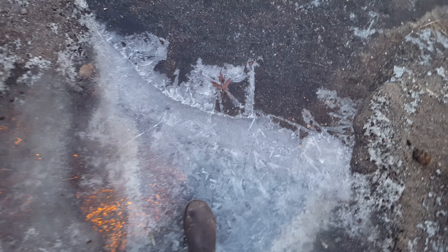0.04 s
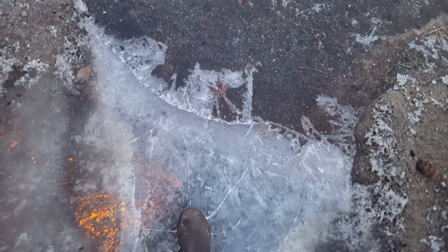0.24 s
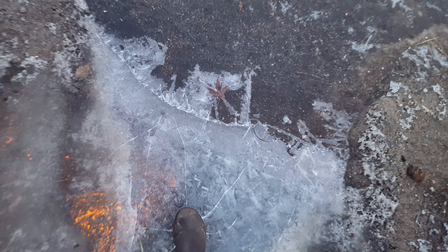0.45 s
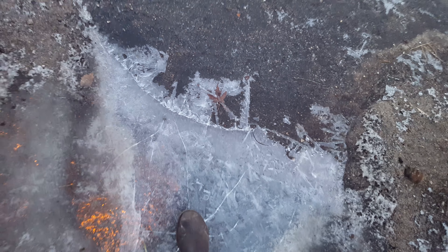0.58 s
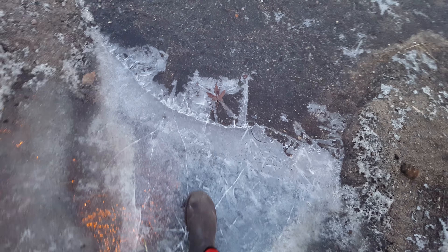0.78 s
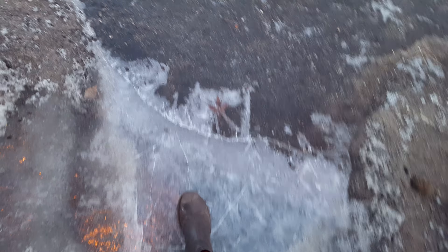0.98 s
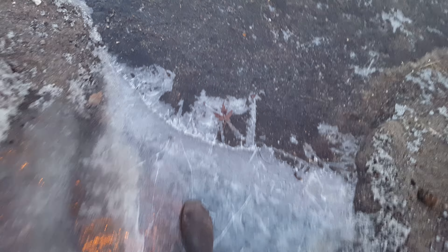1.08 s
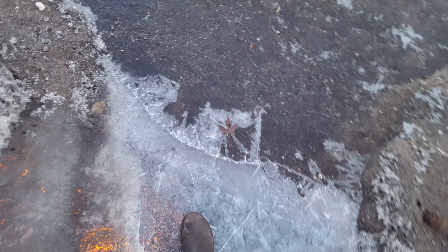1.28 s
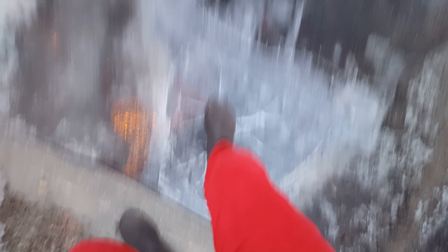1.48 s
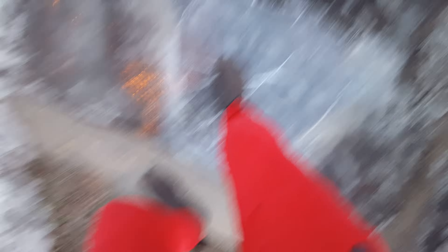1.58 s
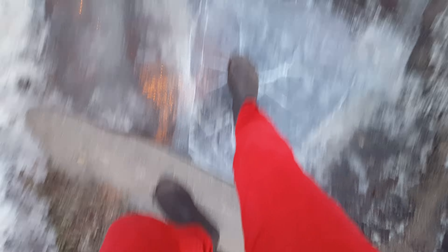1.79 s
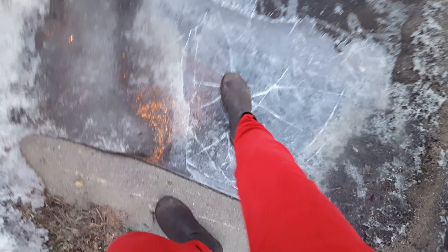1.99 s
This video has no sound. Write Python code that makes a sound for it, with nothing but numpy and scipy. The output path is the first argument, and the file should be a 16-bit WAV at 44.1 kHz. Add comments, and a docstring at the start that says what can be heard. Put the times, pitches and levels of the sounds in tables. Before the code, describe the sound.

Sharp, bright ice cracks with a hollow ring come in three bursts as a boot presses a frozen puddle, separated by tiny frosty pops and light crunching, over low outdoor rumble, picked up close in stereo.

```python
"""Outdoors, at a frozen puddle: a boot presses on the thin ice, heard by a hand-held microphone above.
Bursts of cracks are noise with sudden rise and exponential fall, partly resonant; damped sines ring as the
hollow sheet. Creak and crunch are noise puffed by uneven stick-slip, and frost grains pop as short noise bursts.
Under them lies a low outdoor rumble with faint hiss, made of filtered noise."""
import sys
import numpy as np
from scipy import signal
from scipy.fft import rfft, irfft
from scipy.io import wavfile
from scipy.ndimage import uniform_filter1d

SR = 44100
rng = np.random.default_rng(int(sys.argv[2]) if len(sys.argv) > 2 else 0)


def to_wav(sig):
    """Store sig (one row per channel, or 1-D mono) as 16-bit WAV at the path in sys.argv[1].

    Samples outside -1..1 are clipped; the rate is SR.
    """
    pcm = np.clip(np.atleast_2d(sig), -1, 1) * 32767
    pcm = np.round(pcm).astype(np.int16)
    wavfile.write(sys.argv[1], SR, pcm.T)  # frames by channels


N = 90404  # length in samples

# Cracks of the ice. Each row: start in seconds, nominal snap level in dB, then body, hollow ring and treble
# levels in dB re snap, snap t60 in seconds, then snap, body and ring pitches in Hz.
CRACKS = [(0.1983, -30.5, -8, 10, -1, 0.036, 2520, 1287, 227),
          (0.2018, -21, -3, -5.5, 2.5, 0.035, 1890, 1260, 220),
          (0.2092, -4.5, -2.5, -34, -7.5, 0.036, 2056, 703, 174),
          (0.2172, -22.5, 14, 5.5, -6, 0.049, 2270, 685, 162),
          (0.2353, -33, 4.5, -14, 7.5, 0.087, 2080, 1130, 160),
          (0.265, -30.5, 3.5, -16, -11, 0.056, 2550, 1280, 334),
          (0.2687, -23.5, 1.5, -17, 3, 0.057, 2250, 660, 347),
          (0.2943, -10, 2, -4, 0, 0.047, 1590, 385, 149.3),
          (0.296, -13, 1, -6.5, -13, 0.036, 2230, 393, 360),
          (0.3037, -23.5, 0.5, -0.5, 0.5, 0.057, 2120, 540, 124.4),
          (0.3685, -36.5, -2, -12, 2, 0.11, 2320, 1260, 125),
          (0.380, -36, 5, -23, -1, 0.051, 2250, 1004, 130),
          (0.3968, -39, -17, -7.5, 8, 0.031, 2360, 595, 118),
          (0.461, -39, 3.5, -34, -0.5, 0.031, 2400, 837, 220),
          (0.4972, -49, -15, -8, 14, 0.036, 2680, 536, 128),
          (0.516, -40, -11, -11.5, 4, 0.026, 2320, 1017, 119.7),
          (0.6395, -39, -18.5, -12, -20, 0.011, 2015, 1030, 130),
          (0.8573, -48.5, -4.5, -9.5, -1, 0.043, 2305, 1190, 118),
          (1.093, -40, -20, -25, 3, 0.038, 2260, 930, 310),
          (1.1001, -32, -7.5, -22, -1.5, 0.064, 2300, 920, 130),
          (1.1172, -23.5, -28, -9, -3, 0.049, 1630, 1250, 169),
          (1.1437, -38.5, 17, 5, 8, 0.029, 2280, 790, 148),
          (1.1492, -12, -5.5, -25, -7.5, 0.037, 2170, 990, 128),
          (1.158, -26.5, 11.5, 7.5, -28, 0.036, 2000, 977, 129),
          (1.1926, -43.5, -4, -2, -12, 0.096, 2380, 650, 131),
          (1.2102, -35.5, -15, -15, -14, 0.029, 2220, 1130, 192),
          (1.385, -37, -7, -6, 4, 0.07, 3130, 530, 243), (1.391, -24, -7, -37, 1.5, 0.043, 2450, 524, 179),
          (1.4086, -11.5, -10, -0.5, -3, 0.054, 2980, 513, 241),
          (1.4177, -22, 4.5, -1, 2, 0.14, 2740, 1036, 250),
          (1.432, -18.5, -2, -5, -6, 0.087, 2060, 546, 247),
          (1.4629, -16.5, -2.5, -17, -2.5, 0.037, 2850, 1030, 120),
          (1.4697, -27.5, 2.5, -4.5, 1.5, 0.087, 2300, 617, 134),
          (1.479, -18.5, -9, -27, -2, 0.049, 1980, 1027, 130),
          (1.496, -41.5, -2, 7, 1.5, 0.19, 3120, 634, 130),
          (1.5208, -23.5, -16, -37, -2, 0.042, 2300, 980, 352),
          (1.54, -34, 6, -7, 8.5, 0.058, 2010, 1025, 360),
          (1.5502, -37.5, 1, -6.5, 7.5, 0.07, 2230, 770, 390),
          (1.56, -35.5, -4, -33, 5, 0.036, 2840, 1095, 220),
          (1.627, -48, 3, 1.5, -14, 0.058, 2100, 627, 368),
          (1.7446, -43, 7, -27, -1, 0.023, 2360, 500, 218),
          (1.9687, -41.5, -6, -25, 2, 0.067, 2530, 804, 119)]
# Snap colour. Each row: frequency in Hz, relative level in dB per Hz.
SNAP_SPECTRUM = [(240, -18.5), (400, -6), (1040, -6.5), (1650, -10.5), (2290, -1.5), (2750, -5.5),
                 (3350, -7.5), (3900, -16), (6000, -19), (7800, -54.5), (13200, -120)]
# Treble colour of cracks, creaks and pops. Each row: frequency in Hz, relative level in dB per Hz.
TREBLE_SPECTRUM = [(2060, -20.5), (3500, -7.5), (3750, -7), (8420, -10.5), (12100, -6.5), (14600, -11.5),
                   (16000, -20)]
# Hollow modes of the ice sheet. Each row: frequency in Hz, level in dB, t60 in seconds.
SHEET_MODES = [(131.8, -2, 0.2), (164.2, 4, 0.11), (243.3, 0, 0.092), (346.4, -8, 0.2), (383, 1, 0.1),
               (515, -4, 0.1), (635, -2.5, 0.056)]
# Dull knocks of the boot on the sheet. Each row: start in seconds, level in dB, ring pitch in Hz.
KNOCKS = [(1.0147, -23.5, 165), (1.016, -27, 394), (1.13, -25.5, 172)]
# Creak and crunch under the sole, one list for each stretch. Each row: time in seconds, level in dB,
# treble in dB re level, slip depth from 0 to 1.
CREAKS = [
    [(0.31, -26.5, -1, 0), (0.326, -47.5, -5, 0.5), (0.618, -60, -2, 0.8), (0.635, -47, 2, 0.6)],
    [(0.635, -68, -16, 0.7), (0.64, -41, -8.5, 0.3), (0.74, -49, -3, 0.3), (0.765, -74, -4, 0.4)],
    [(1.02, -59.5, -12, 0.34), (1.082, -50.5, -6.5, 0.98), (1.116, -27, -8, 0), (1.149, -40.5, -7, 0.7)],
    [(1.17, -46, -10, 1), (1.215, -43.5, -8, 0.5), (1.235, -57, -5, 0.8), (1.33, -54.5, -15, 1),
     (1.36, -48.5, -1.5, 0.7), (1.385, -42, -9, 0.1)],
    [(1.57, -55, -11, 0.38), (1.604, -73, 15, 0.6), (1.64, -45, -3, 0.2), (1.748, -40, -8.5, 0.5),
     (1.768, -53, -8, 0.5), (1.79, -67, -5, 0.7)],
    [(1.88, -62, -7, 0.3), (1.966, -62.5, -2, 0.5), (2.028, -65.5, -13, 1), (2.05, -51, 3, 0.9)],
]
# Colour of the crunch. Each row: frequency in Hz, relative level in dB per Hz.
GRIT_SPECTRUM = [(180, -25.5), (300, -15.5), (483, -3), (686, -7), (797, -4.5), (1630, -8), (2230, -0.5),
                 (6000, -20.5), (7800, -58), (13200, -120)]
# Frost grains that pop one at a time. Each row: start in seconds, level in dB.
POPS = [(0.4396, -49), (0.7731, -59.5), (0.7876, -60.5), (0.9512, -70.5), (1.0183, -61), (1.053, -50.5),
        (1.085, -39), (1.1082, -28), (1.173, -42), (1.204, -47), (1.256, -51), (1.279, -51), (1.2902, -55),
        (1.304, -53), (1.315, -45.5), (1.3244, -52), (1.3328, -46.5), (1.3468, -43.5), (1.5926, -53),
        (1.6155, -43.5), (1.655, -38.5), (1.7635, -43.5), (1.7962, -57.5), (1.8394, -49), (1.908, -49.5),
        (1.9351, -46), (1.9883, -47), (1.9984, -45), (2.039, -51)]
# Outdoor background colour. Each row: frequency in Hz, relative level in dB per Hz.
AIR_SPECTRUM = [(15, -42.5), (25, -18.5), (70, -4), (170, -10), (317, -15.5), (373, -23.5), (962, -31.5),
                (1100, -41), (1700, -32), (2760, -47.5), (16000, -67)]
# Background level in time. Each row: time in seconds, level in dB.
AIR_LEVEL = [(0.0, -39), (0.22, -45), (0.37, -50.5), (0.95, -53.5), (1.15, -44.5), (1.6, -53), (1.8, -49),
             (2.05, -47)]
# Gain of the hiss above the rumble. Each row: time in seconds, gain in dB.
AIR_TILT = [(0, 4), (.2, 8.5), (.5, 3), (1, 9.5), (2.05, 7.5)]
# Left-right likeness of the ice sounds. Each row: frequency in Hz, likeness (clipped to 0-1 in use).
ICE_LIKENESS = [(60, 0.48), (180, 0.66), (550, 0.65), (1650, 0.21), (4970, -0.21), (15000, -0.04)]
# Left-right likeness of the background. Each row: frequency in Hz, likeness.
AIR_LIKENESS = [(60, 1), (400, 0.59), (1000, 0.17), (3000, 0.084)]
# Stereo balance of the ice sounds. Each row: frequency in Hz, left minus right in dB.
ICE_LEAN = [(60, -2.5), (180, -8.5), (550, 1), (1650, -6), (4970, -1), (15000, -1.5)]

SNAP_RISE_S, BODY_RISE_S, SPIT_RISE_S = 0.0012, 0.0012, 0.00024
BODY_LIFE, TREBLE_LIFE = 0.82, 0.66  # t60 as a share of the snap t60
HEAD_DB, HEAD_T60_S = -4.5, 0.0087  # first fracture, re snap, added to the splintering that follows
CLICK_DB = 14.5  # the instant of breaking, re snap
SPLINTER_DB = 1  # rms unevenness of the fractures
SNAP_WIDTH_HZ, BODY_WIDTH_HZ = 300, 120  # resonance bandwidths
PITCHED_GAIN, BROAD_GAIN = 0.57, 0.83  # resonant and broadband parts of the snap
RING_RISE_S, RING_DB_PER_OCTAVE = 0.0023, 8.5
SLIPS_PER_S, SLIP_T60_S = 160, 0.021  # nominal, both vary as the slip rate wanders
SLIP_SPREAD_DB, SLIP_WANDER_DB = 1.5, 2.0  # rms spread of slip sizes and of slip rate
POP_T60_S, POP_GRIT_DB = 0.024, -2
LAG_S = 0.00005  # the right port hears the ice first
MIC_LOW_HZ, EDGE_HZ = 53.6, 16100


def cracks():
    """Brittle fracture: a bright snap, a slower body under it, a quick treble spit and the ring of the sheet."""
    s, db, body_db, ring_db, treble_db, t60, snap_hz, body_hz, ring_hz = np.transpose(CRACKS)
    tail = bursts(db, t60, SNAP_RISE_S)
    head = bursts(db + HEAD_DB, np.full(len(s), HEAD_T60_S), SNAP_RISE_S)
    snaps = splinters(tail + head)
    # A one-sample click at the end of the rise marks the break.
    snaps[:, :, round(SNAP_RISE_S * SR)] += amp(db + CLICK_DB)[:, None]
    resonant = placed(s, pitched(snaps, snap_hz, SNAP_WIDTH_HZ))
    broad = coloured(placed(s, snaps), SNAP_SPECTRUM)
    snap = PITCHED_GAIN * resonant + BROAD_GAIN * broad

    bodies = splinters(bursts(db + body_db, t60 * BODY_LIFE, BODY_RISE_S))
    body = placed(s, pitched(bodies, body_hz, BODY_WIDTH_HZ))
    spits = splinters(bursts(db + treble_db, t60 * TREBLE_LIFE, SPIT_RISE_S))
    spit = coloured(placed(s, spits), TREBLE_SPECTRUM)

    wide = ports(snap + spit, ICE_LIKENESS, ICE_LEAN, LAG_S)
    ring = sheet(s, db + ring_db, ring_hz) + sheet(*np.transpose(KNOCKS))
    return wide + body[0] + ring  # body and ring are alike in both ports


def sheet(times, dbs, pitch_hz):
    """Modal excitation: each push swells into the hollow modes, most of all those near its own pitch."""
    t = np.arange(SR // 3) / SR
    hz, gain_db, t60 = np.transpose(SHEET_MODES)[:, :, None]
    swell = (1 - np.exp(-t / RING_RISE_S)) ** 2
    modes = swell * amp(gain_db - 60 * t / t60) * np.sin(2 * np.pi * hz * t)
    octaves_away = abs(np.log2(hz.T / pitch_hz[:, None]))
    shares = amp(dbs[:, None] - RING_DB_PER_OCTAVE * octaves_away)
    return placed(times, shares @ modes)


def creaks():
    """Stick-slip friction of sole and shards: short uneven puffs of grit over a bed of rustle."""
    t = np.arange(N) / SR
    level, treble, depth = np.zeros((3, N))
    for s, db, treble_db, slip in map(np.transpose, CREAKS):
        inside = (t >= s[0]) & (t < s[-1])
        level += inside * amp(np.interp(t, s, db))
        treble += inside * amp(np.interp(t, s, db + treble_db))
        depth += inside * np.clip(np.interp(t, s, slip), 0, 1)

    wander = evened(uniform_filter1d(rng.standard_normal(N), size=400))
    turns = np.cumsum(SLIPS_PER_S * amp(SLIP_WANDER_DB * wander)) / SR  # slips so far
    sizes = amp(SLIP_SPREAD_DB * rng.standard_normal(4000))[turns.astype(int) % 4000]
    puffs = evened(sizes * amp(-60 * (turns % 1) / (SLIPS_PER_S * SLIP_T60_S)))
    slips = np.sqrt(1 - depth + depth * puffs ** 2)  # depth mixes steady and puffed power

    grit = coloured(rng.standard_normal((2, N)) * slips * level, GRIT_SPECTRUM)
    fizz = coloured(rng.standard_normal((2, N)) * slips * treble, TREBLE_SPECTRUM)
    return ports(grit + fizz, ICE_LIKENESS, ICE_LEAN, LAG_S)


def pops():
    """Impulsive release of frost grains: short bright ticks with a little grit under them."""
    s, db = np.transpose(POPS)
    ticks = placed(s, splinters(bursts(db, np.full(len(s), POP_T60_S), SPIT_RISE_S)))
    bright = coloured(ticks, TREBLE_SPECTRUM)
    gritty = amp(POP_GRIT_DB) * coloured(ticks, GRIT_SPECTRUM)
    return ports(bright + gritty, ICE_LIKENESS, ICE_LEAN, LAG_S)


def air():
    """Filtered random noise: a lumpy low rumble with a faint hiss above it."""
    t = np.arange(N) / SR
    noise = coloured(rng.standard_normal((2, N)), AIR_SPECTRUM)
    noise = evened(ports(noise, AIR_LIKENESS, [(1, 0.005)], 0))
    rumble = signal.sosfilt(signal.butter(2, 600, fs=SR, output="sos"), noise)
    hiss = noise - rumble
    lumps_db = 0.34 * evened(uniform_filter1d(rng.standard_normal(N), size=1500))
    level = amp(np.interp(t, *np.transpose(AIR_LEVEL)))
    tilt = amp(np.interp(t, *np.transpose(AIR_TILT)))
    return level * (rumble * amp(lumps_db) + hiss * tilt)


def bursts(dbs, t60s, rise_s):
    """Exponential decay after a sudden linear rise: one envelope row for each event."""
    t = np.arange(SR // 8) / SR
    fall_db = 60 * t / np.maximum(t60s[:, None], 0.004)
    return np.minimum(t / rise_s, 1) * amp(dbs[:, None] - fall_db)


def splinters(shapes):
    """Fracture as many small breaks: noise lumpy on a millisecond scale, each burst keeping its energy."""
    z = rng.standard_normal((len(shapes), 3, shapes.shape[1]))
    lumps_db = SPLINTER_DB * evened(uniform_filter1d(z[:, 2:], size=30))
    x = shapes[:, None] * z[:, :2] * amp(lumps_db)
    wanted = np.linalg.norm(shapes, axis=1)[:, None, None]
    return x * wanted / np.linalg.norm(x, axis=2, keepdims=True)


def pitched(sounds, pitch_hz, width_hz):
    """Damped resonance: each burst rings the shard that it frees and keeps its energy."""
    t = np.arange(1500) / SR
    taps = np.exp(-np.pi * width_hz * t) * np.sin(2 * np.pi * pitch_hz[:, None] * t)
    rung = signal.fftconvolve(sounds, taps[:, None], axes=2)
    wanted = np.linalg.norm(sounds, axis=2, keepdims=True)
    return rung * wanted / np.linalg.norm(rung, axis=2, keepdims=True)


def placed(times, sounds):
    """Superposition: short sounds, one row for each event, add up on the time line."""
    out = np.zeros((2, N + SR))
    for s, sound in zip(times, sounds):
        out[:, round(s * SR):][:, :sound.shape[-1]] += sound
    return out[:, :N]


def coloured(x, spectrum):
    """Minimum-phase filtering: a causal filter of unit energy with the given spectrum, steep outside it."""
    hz = np.abs(np.fft.fftfreq(4096, 1 / SR))
    points = [(1, -90)] + list(spectrum) + [(SR, -90)]
    log_gain = np.log(amp(np.maximum(read(points, hz), -90)))
    # The Hilbert transform of the log gain gives the minimum phase.
    phase = -signal.hilbert(log_gain).imag
    taps = np.fft.ifft(np.exp(log_gain + 1j * phase)).real[:2048]
    return signal.oaconvolve(x, taps[None] / np.linalg.norm(taps), axes=1)[:, :N]


def ports(pair, same, lean, lag_s):
    """Interaural coherence: two unrelated signals become left and right, alike by frequency."""
    a, b = rfft(pair)
    hz = np.fft.rfftfreq(N, 1 / SR)
    likeness = np.clip(read(same, hz), 0, 1)
    half_lean = amp(read(lean, hz) / 2)
    left = a * half_lean * np.exp(-2j * np.pi * hz * lag_s)
    right = (likeness * a + np.sqrt(1 - likeness ** 2) * b) / half_lean
    return irfft([left, right], N)


def read(points, hz):
    """Logarithmic pitch scale: a table is interpolated along log frequency."""
    f, value = np.transpose(points)
    return np.interp(np.log(hz + 1), np.log(f + 1), value)


def amp(db):
    """Decibel law: 20 dB is a tenfold amplitude."""
    return 10 ** (np.asarray(db) / 20)


def evened(x):
    """Power normalisation: the whole array is scaled to an rms of one."""
    return x / np.sqrt(np.mean(x ** 2) + 1e-20)


def scene():
    """Superposition of the ice sounds and the outdoor background."""
    return cracks() + creaks() + pops() + air()


def record(dry):
    """Microphone response: soft overload, a deep-bass roll-off, then an upper band limit."""
    soft = 0.97 * np.tanh(dry / 0.97)
    thin = signal.sosfilt(signal.butter(2, MIC_LOW_HZ, "high", fs=SR, output="sos"), soft)
    band = signal.firwin(511, EDGE_HZ, window=("kaiser", 9), fs=SR)
    return signal.oaconvolve(thin, band[None], "same")


dry = scene()
out = record(dry)
to_wav(out)
```